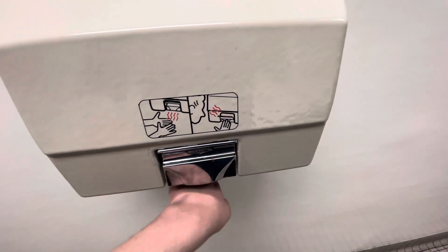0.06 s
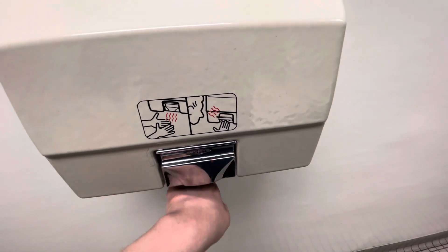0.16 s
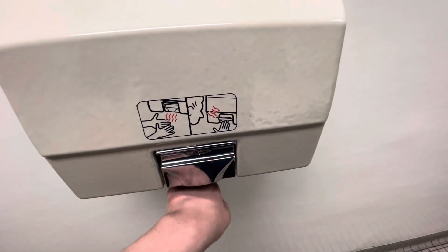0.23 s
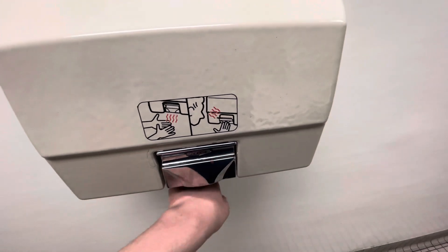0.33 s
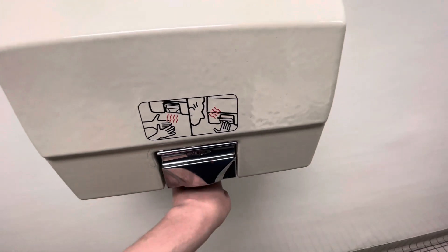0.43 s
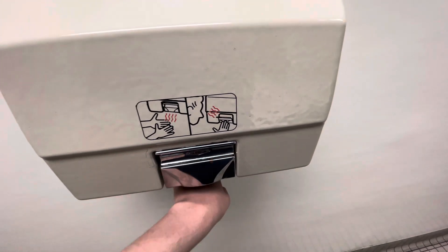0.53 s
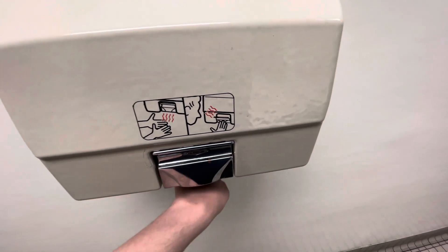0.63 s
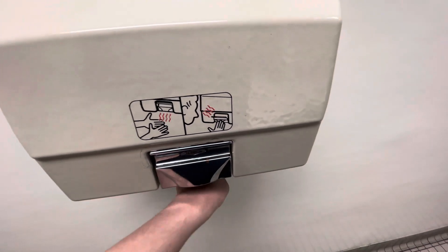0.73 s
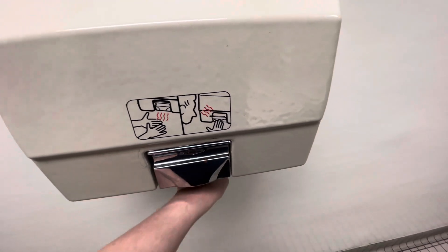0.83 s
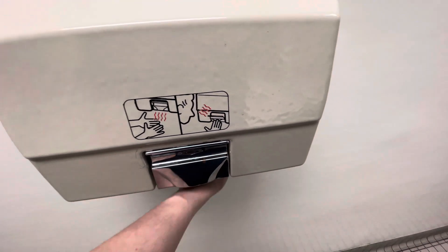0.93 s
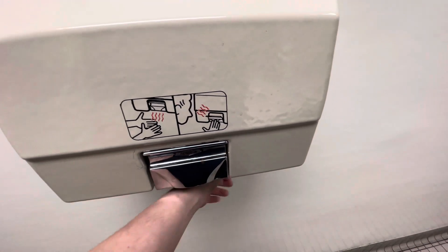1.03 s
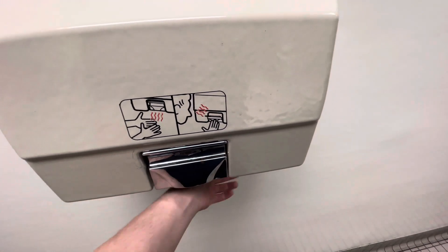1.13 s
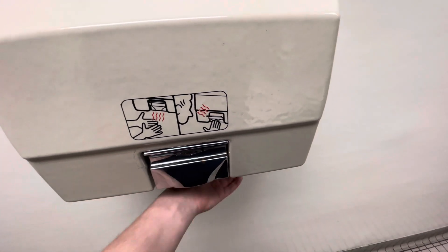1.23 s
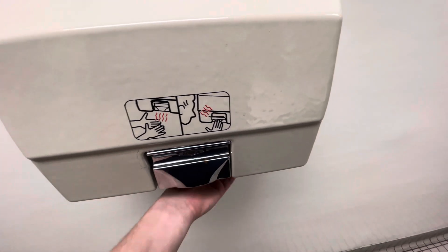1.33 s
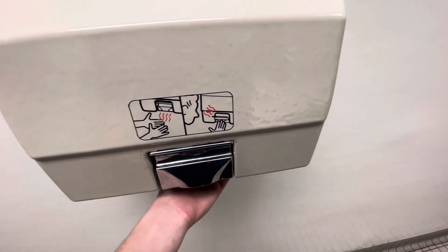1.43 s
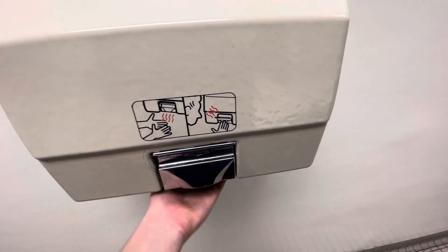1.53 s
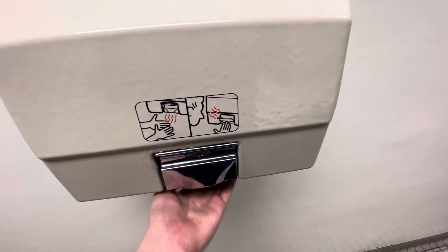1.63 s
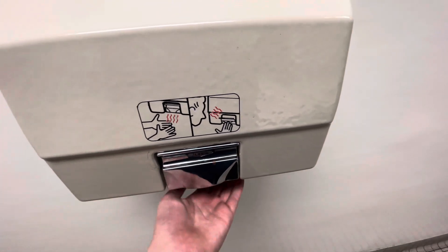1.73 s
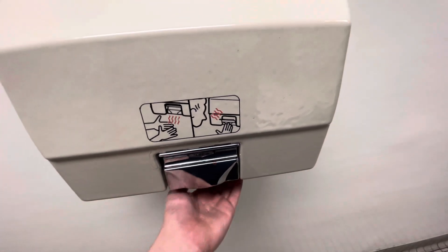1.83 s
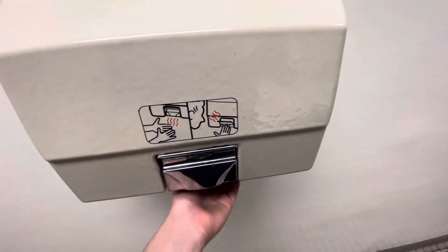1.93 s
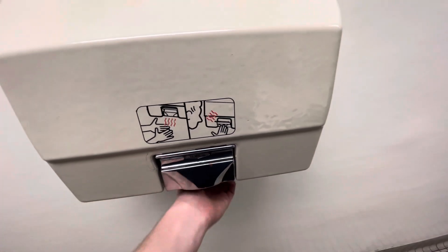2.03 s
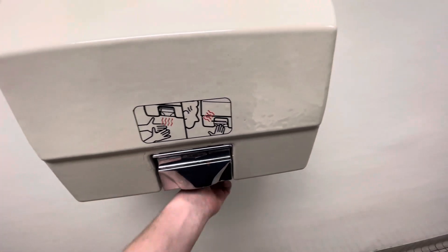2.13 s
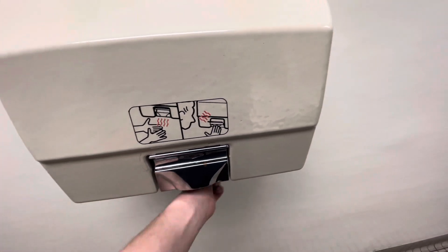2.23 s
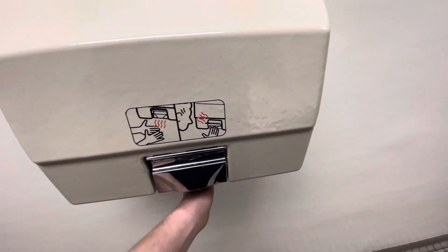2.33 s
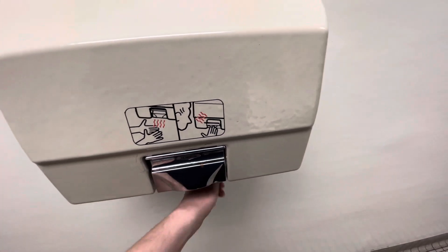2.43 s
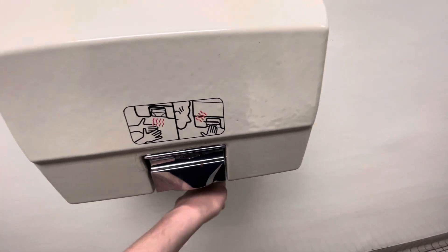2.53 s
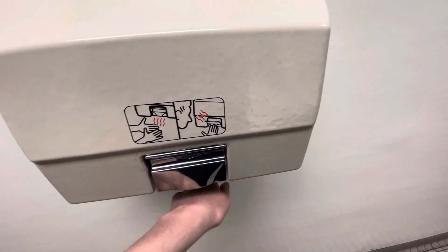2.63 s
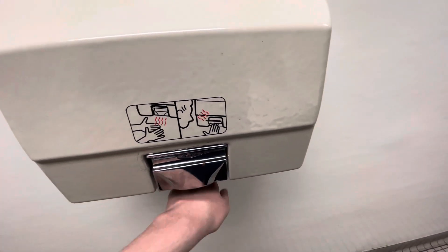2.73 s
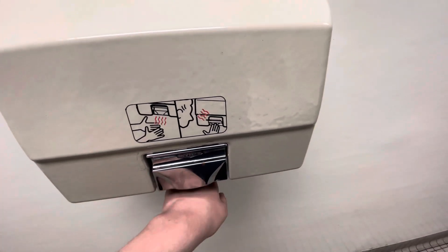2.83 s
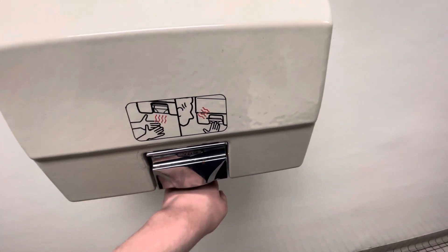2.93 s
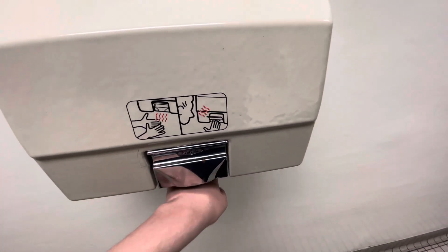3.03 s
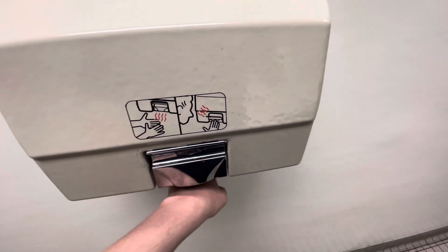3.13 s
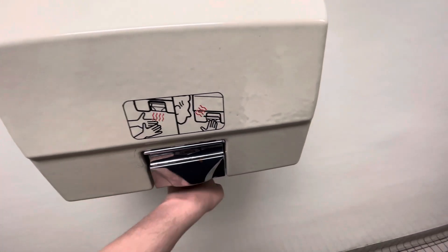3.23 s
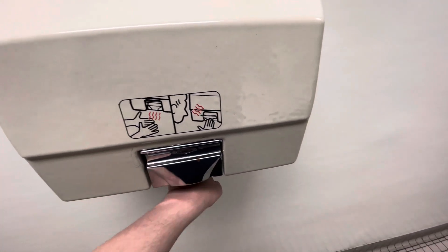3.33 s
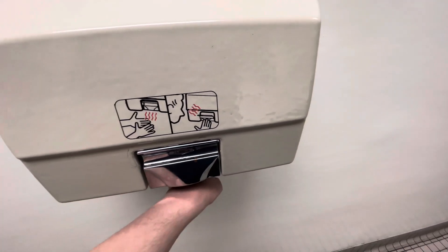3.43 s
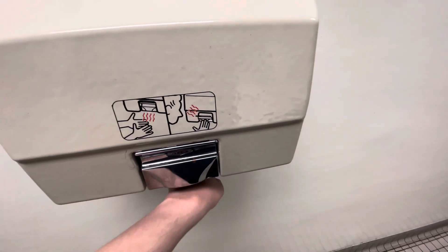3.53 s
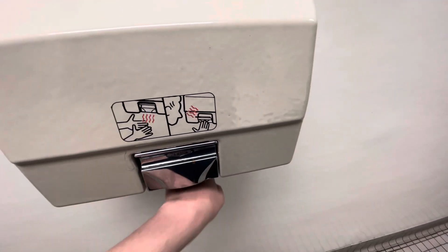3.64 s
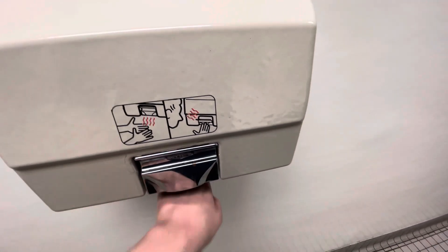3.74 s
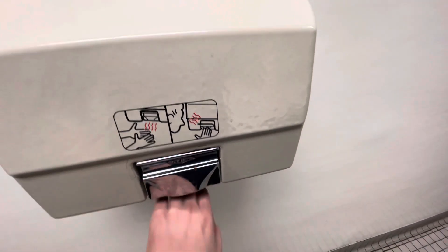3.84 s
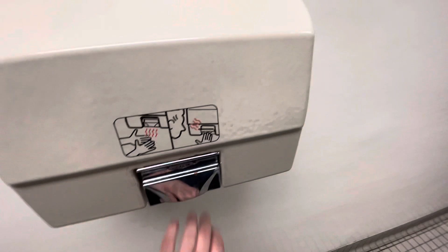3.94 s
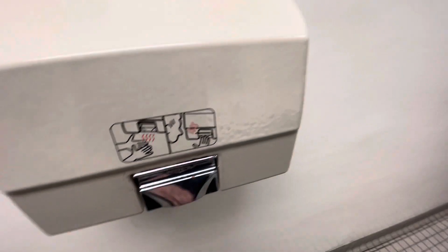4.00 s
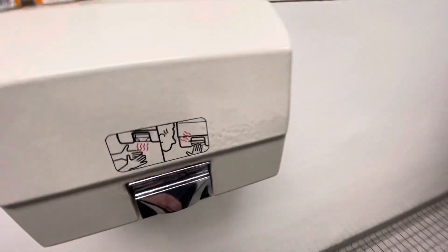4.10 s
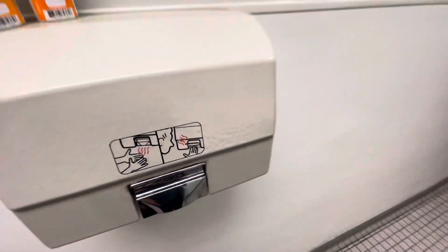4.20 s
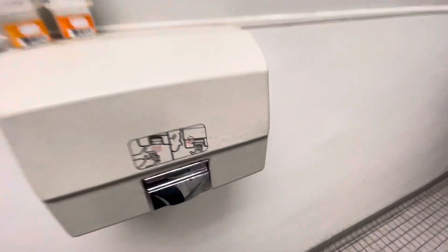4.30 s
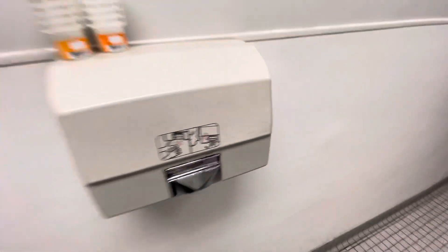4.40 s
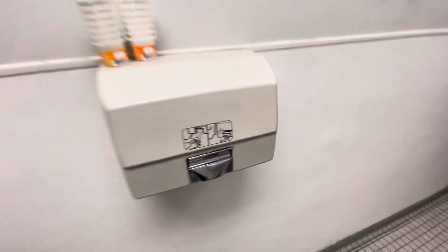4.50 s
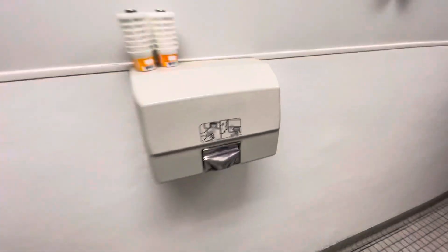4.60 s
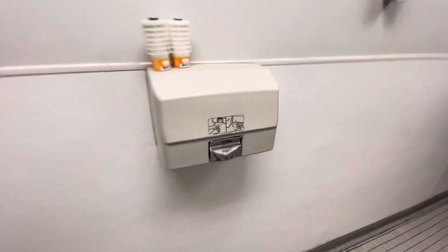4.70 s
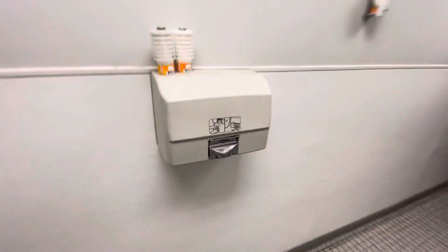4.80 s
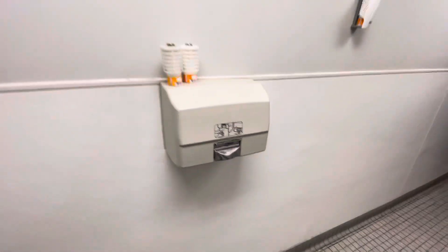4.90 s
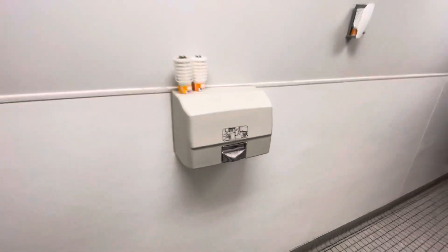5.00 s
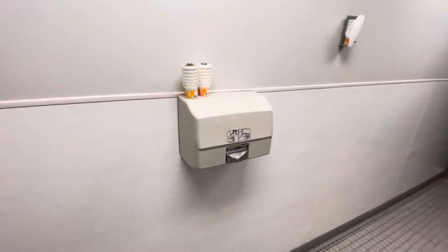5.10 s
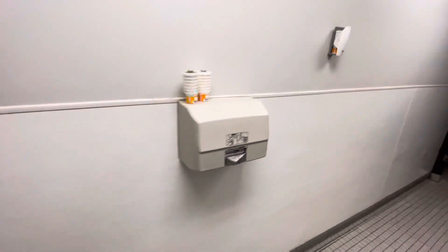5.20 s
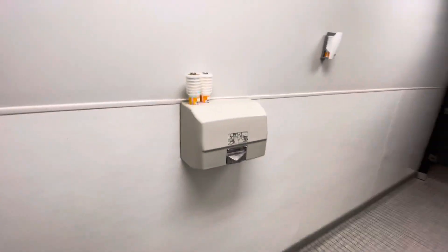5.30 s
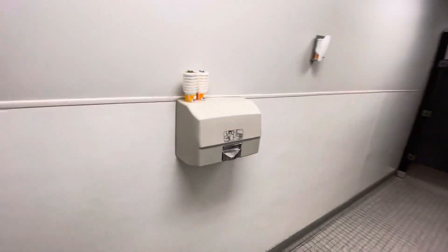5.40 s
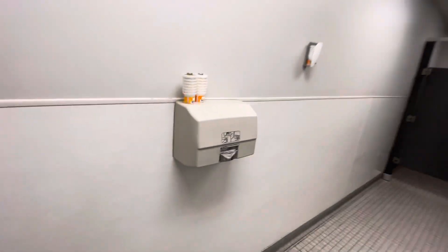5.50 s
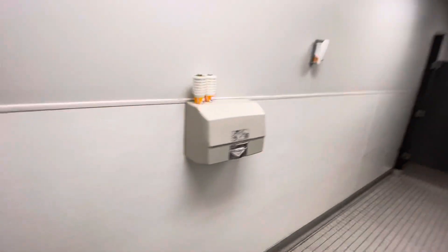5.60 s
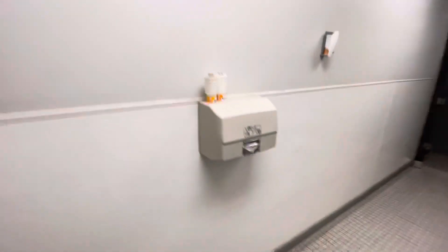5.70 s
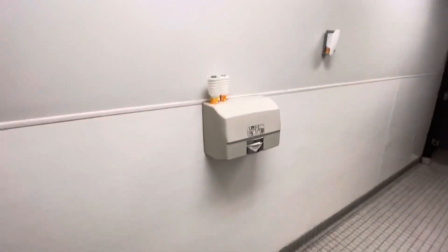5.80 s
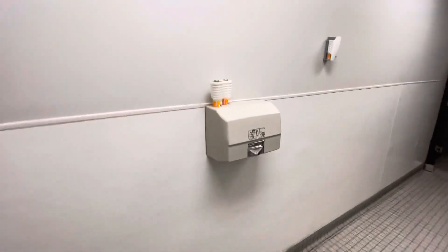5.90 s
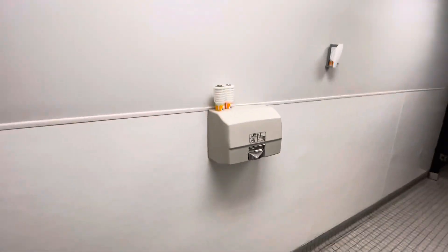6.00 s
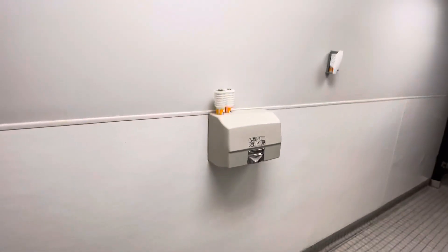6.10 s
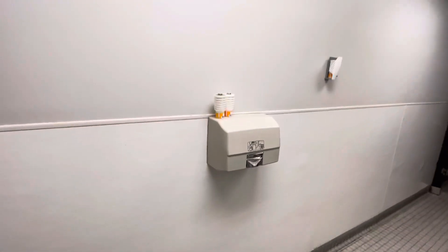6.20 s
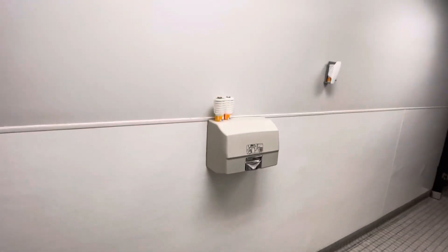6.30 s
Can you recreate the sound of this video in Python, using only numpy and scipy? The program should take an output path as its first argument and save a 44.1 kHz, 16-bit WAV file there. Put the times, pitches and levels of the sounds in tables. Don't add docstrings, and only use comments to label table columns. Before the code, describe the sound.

Close, roaring warm-air dryer with low motor hum and windy buffeting, growing roomier as the listener steps back, before the power stops and the airflow fades.

```python
import sys
import numpy as np
from scipy import signal
from scipy.fft import irfft, next_fast_len
from scipy.io import wavfile
from scipy.ndimage import uniform_filter1d

SR = 44100
rng = np.random.default_rng(int(sys.argv[2]) if len(sys.argv) > 2 else 0)


def boost(x):
    u = np.asarray(x, float) / 20
    return 10 ** u


def wav_record(signal):
    frames = np.transpose(np.atleast_2d(signal))
    bounded = np.clip(frames, -1, 1)
    quanta = np.round(bounded * 32767).astype(np.int16)
    wavfile.write(sys.argv[1], SR, quanta)


N = 280024
T = np.arange(N) / SR
HZ = np.arange(next_fast_len(N) // 2 + 1) * SR / next_fast_len(N)

# frequency in Hz, left minus right in dB.
NEAR_PAN = [(172, -2), (517, 2.5), (1034, 2.5), (1378, 1), (1723, -5.5), (2067, -5), (2929, -0.5),
            (3962, 1.5), (4307, 0.3), (5512, 4), (7407, 0.9), (8786, -6.5), (9819, -1.5), (11370, 1.2)]
FAR_PAN = [(172, -0.5), (1378, 3), (2239, 0.5), (3273, 3), (4134, 0), (4823, 5.5), (6029, 6), (8096, 3),
           (9475, -2), (11370, 2)]
TAIL_PAN = [(172, -0.5), (1895, 6.5), (4479, 3), (5168, 10), (7235, 14), (8441, 8), (8958, 0), (11370, 1.1)]

BACK_FROM_S, BACK_TO_S = 3.83, 5.22
HAND_LEAVES_S, HAND_TAKES_S = 3.82, 0.53
FACING_FROM_S, FACING_TO_S = 4.82, 5.22
SAG_STARTS_S, CUT_S, JET_DIES_S = 5.63, 5.69, 5.695
SIDE = np.array([[0.5], [-0.5]])


def table(rows, at, warp=np.asarray):
    x, *columns = np.transpose(rows)
    return [np.interp(warp(at), warp(x), column) for column in columns]


def ramp(start, end):
    return np.clip((T - start) / (end - start), 0, 1)


def humps(rows):
    return sum(top * np.cos(np.pi * np.clip((T - s) / length, -0.5, 0.5)) ** 2 for s, length, top in rows)


def walk(rate):
    hold = int(SR / rate)
    steps = np.repeat(rng.standard_normal(N // hold + 1), hold)
    smooth = uniform_filter1d(uniform_filter1d(steps, hold), hold)[:N]
    return smooth / smooth.std()


def hiss(count):
    return rng.standard_normal((count, len(HZ))) + 1j * rng.standard_normal((count, len(HZ)))


def swells():
    # start in seconds, length in seconds, level in dB, frequency in Hz, width in Hz.
    passing = [(1.55, 0.39, -33, 2100, 410), (1.549, 0.24, -27, 1260, 380), (5.424, .28, -28.5, 250, 12),
               (5.098, 0.45, -34, 1682, 42), (5.205, 0.36, -37, 2347, 85), (5.3, 0.46, -30.5, 1410, 270),
               (6.255, 0.055, -46, 2520, 300), (6.295, .07, -38, 1010, 25), (4.8, .25, -30, 197, 60),
               (3.72, .16, -39, 3600, 600)]
    out = np.zeros((2, N + SR))
    for s, length, db, hz, width in passing:
        pan_db = 1.9 * table(NEAR_PAN if s < BACK_FROM_S else FAR_PAN, hz)[0]
        start, size = int(s * SR), int(length * SR)
        peak = signal.iirpeak(hz, hz / width, SR)
        ring = signal.lfilter(*peak, rng.standard_normal((2, SR)))
        ring = signal.lfilter(*peak, ring)[:, -size:]
        ring = ring + 0.78 * ring[::-1]
        hump = np.sin(np.pi * np.arange(size) / size)
        out[:, start:start + size] += boost(db + pan_db * SIDE) * hump * ring / ring.std()
    return out[:, :N]


def wind_level():
    # centre in seconds, length in seconds, dB over the steady wind.
    gusts = [(0.0, .3, 9), (.3, .2, 1), (.76, .35, 9), (1.34, .35, 8), (1.72, .2, 5), (2.4, .6, 6),
             (3.0, 0.78, 4), (3.6, .5, 7), (5.67, .1, 4), (6.07, .3, 8)]
    hand_gone = ramp(HAND_LEAVES_S - 0.15, HAND_LEAVES_S)
    running_out = ramp(FACING_TO_S, JET_DIES_S)
    return -43 + humps(gusts) - 7.5 * hand_gone - 4 * running_out


def air_levels():
    # centre in seconds, length in seconds, strength.
    cuppings = [(1.2, 0.55, 0.26), (1.68, 0.65, 1.1), (3, .3, .3), (3.78, .3, 0.67)]
    # steady level in dB, dB per cupping, dB with the hand gone, dB facing the nozzle,
    # dB lost in the run-down, run-down time constant in seconds.
    layers = [
        (-22.5, -1.5, -4, -1, -12.5, 0.18),
        (-24.5, 2, -2.5, .8, -21.5, 0.62),
        (-34, 1.5, -2.5, 4, -19.5, 0.3),
        (-35.5, 2.5, -2, 3.5, -17, 0.35),
    ]
    cup = humps(cuppings)
    gone = ramp(HAND_LEAVES_S, HAND_LEAVES_S + HAND_TAKES_S)
    facing = ramp(FACING_FROM_S, FACING_TO_S)
    coasting = np.clip(T - JET_DIES_S, 0, None)
    levels = [wind_level()]
    for db, cup_db, gone_db, face_db, lost_db, tau in layers:
        run_down_db = lost_db * (1 - np.exp(-coasting / tau))
        levels.append(db + cup_db * cup + gone_db * gone + face_db * facing + run_down_db)
    return levels


def ports(gain, alike, lead, pan):
    both, left, right = hiss(count=3)
    share = np.clip(table(alike, HZ)[0], 0, 1)
    turn = np.exp(0.5j * table(lead, HZ)[0])
    tilt = boost(table(pan, HZ)[0] / 2)
    shared, own = np.sqrt(share), np.sqrt(1 - share)
    left_port = tilt * (shared * turn * both + own * left)
    right_port = (shared / turn * both + own * right) / tilt
    return gain * np.array([left_port, right_port])


def turbulence(colour, column, alike, lead, pan):
    # frequency in Hz, width in Hz, lift in dB close by,
    # lift in dB far off, lift in dB in the tail.
    casing = [(62, 25, 10, 7, 5), (128.5, 14, 7, 0, 0.3), (172, 14.8, 11, 5, -3), (196, 33, 5.5, 7, 7.5),
              (254, 25, 1.7, 2.5, 10.5), (311.2, 7.2, 8.5, -9, -3), (334, 20, 4.5, 1.5, 3),
              (406, 63, 3.5, -7, 5.5), (458, 14, -5, 6.5, -4), (785, 26, 3, 4, 7.5),
              (965.2, 29, 1.8, 5, -7), (1057, 30, -1, 2, -8), (1121, 78, 10, 6, -0.5),
              (1252, 48, 4, 3, 5.5), (1288, 29, 8, 0.4, 0), (1388, 48, 11, -1.5, -3),
              (1495, 42, 9.5, -8, 3), (1600, 51, 9.5, -5.5, 0.0), (2142, 32, 6, 0, 3),
              (2330, 54, 2, 8, 7.5), (3320, 180, 7.5, -1, 0.1), (3950, 247, 5, -1, -1),
              (6770, 92, 5, 4.5, 1)]
    lift_db = sum(row[column] / (1 + (2 * (HZ - row[0]) / row[1]) ** 2) for row in casing)
    colour_db = table(np.vstack(colour), HZ + 1, np.log)[0]
    return ports(boost(colour_db + lift_db), np.vstack(alike), np.vstack(lead), pan)


def band(spectra, edge):
    x = irfft(spectra * edge)[:, :N]
    return x / x.mean(axis=0).std()


def air():
    # frequency in Hz, level in dB.
    near_colour = [
        [(25, -32), (50, -11.5), (100, -6.5), (150, -7), (200, 0.0), (280, -4), (370, -11), (520, -8.5), (850, -10.5), (1000, -7), (1650, -15), (1850, -16)],
        [(2700, -15.5), (3000, -15.5), (3600, -24), (4400, -27), (5400, -23.5), (6500, -21), (7500, -24.5), (8700, -22.5), (9700, -23.5), (10600, -18), (11500, -27), (12100, -33.5), (12600, -47.1), (13200, -72.1)],
    ]
    far_colour = [
        [(25, -26), (50, -17), (100, -8), (150, -6), (200, 1.5), (280, 0), (370, -0.5), (520, -6.5), (850, -3.5), (1000, -5), (1650, -3), (1850, -12)],
        [(2700, -7.5), (3000, -10.5), (3600, -16), (4400, -22.5), (5400, -22.5), (6500, -18), (7500, -18.5), (8700, -23.5), (9700, -21.5), (10600, -20.5), (11500, -30.5), (12100, -43.3), (12600, -48.9), (13200, -73.9)],
    ]
    tail_colour = [
        [(25, -36), (50, -14), (100, -18), (150, -7), (200, 0), (280, -6.5), (370, -16.5), (520, -18), (850, -16.5), (1000, -13.5), (1650, -16.5), (1850, -21)],
        [(2700, -15.5), (3000, -19), (3600, -24), (4400, -29.5), (5400, -30.5), (6500, -25.5), (7500, -27.5), (8700, -28.5), (9700, -31), (10600, -37), (11500, -36), (12100, -96.8), (12600, -88.1), (13200, -113.1)],
    ]
    # frequency in Hz, likeness from 0 to 1.
    near_alike = [
        [(30, 0.32), (200, 0.96), (330, 0.68), (620, 0), (1150, 0.52), (1500, 0.73), (1723, 1), (2100, 0.44), (2412, 0.36), (3101, 0.8), (3700, 0.2), (4300, .62), (5200, 0.24), (6546, 0.3)],
        [(7400, 0.76), (7900, 0), (8400, 0.2), (8786, 0.1), (9400, 0.25), (10000, 0.82), (10500, 0.96), (11300, 0.95), (11800, 0.94)],
    ]
    far_alike = [(30, .7), (100, .95), (172, .88), (517, .26), (2000, .15), (8786, .08), (9400, .55),
                 (10000, .93), (10600, .94), (11300, .6), (11800, .995)]
    # frequency in Hz, phase in radians.
    near_lead = [
        [(172, 0), (1550, 1.2), (1895, 2.5), (2900, 3.2), (3618, 4.2), (4300, 6.35), (4996, 5.2), (5340, 2.9), (6029, 6.1), (6700, 6.8), (7300, 6.3), (8096, 9.2), (8786, 7.6)],
        [(8958, 5.1), (9302, 4.2), (9800, 3.3), (10600, 2.95), (11200, 1.5), (11800, .02)],
    ]
    far_lead = [(172, 0), (1400, -.3), (8613, 1.1), (9400, 3.9), (9800, 3.25), (10700, 3.0), (11370, 1.1),
                (11800, .02)]
    band_edges = [105, 400, 1800, 4500]

    away = np.clip(0.025 + ramp(BACK_FROM_S, BACK_TO_S), 0, 1)
    off = ramp(JET_DIES_S, JET_DIES_S + 0.26)
    near = turbulence(near_colour, column=2, alike=near_alike, lead=near_lead, pan=NEAR_PAN)
    far = turbulence(far_colour, column=3, alike=far_alike, lead=far_lead, pan=FAR_PAN)
    tail = turbulence(tail_colour, column=4, alike=far_alike, lead=far_lead, pan=TAIL_PAN)
    stages = [(1 - away, near), (away * (1 - off), far), (away * off, tail)]

    edges = [1, *band_edges, 16000]
    flickers_db = (0.3, 0.14, 0.73, 0.67, 0.57)
    out = 0
    for lo, hi, db, flicker_db in zip(edges, edges[1:], air_levels(), flickers_db):
        edge = 1 / np.sqrt((1 + (lo / (HZ + 1)) ** 16) * (1 + (HZ / hi) ** 16))
        mix = sum(np.sqrt(share) * band(spectra, edge) for share, spectra in stages)
        out = out + mix * boost(db + flicker_db * walk(16))
    return out


def motor():
    # time in seconds, hum in Hz, hum level in dB.
    powered = [(0, 110.1, -20), (.5, 111.1, -20.5), (1.2, 110.5, -21.5), (1.7, 110.1, -21),
               (2.6, 109.7, -22.5), (3.5, 110.3, -20.5), (4.49, 110.6, -22), (5.5, 110, -31.5),
               (5.62, 110.2, -29)]
    # multiple of the hum (rounded in use), dB relative to it, wobble in dB, left minus right in dB.
    overtones = [(0.9997, 0.5, .5, -1), (2.013, -12.5, 3.5, 1.5), (4.04, -30.5, 3.1, 14),
                 (5.013, -24.5, 4, 6), (5.953, -23, 4, 5), (6.97, -24.5, -1.5, -3), (7.95, -29.5, 3, -4),
                 (12.02, -17.5, 4, -7), (47.4, -38, 7.5, 4)]
    hz, db = table(powered, T)
    since_cut = np.clip(T - CUT_S, 0, 1)
    over_db = 0.48 * (db + 22) - 21 - 300 * since_cut
    hum_db = db - 420 * since_cut
    hz = hz - 50 * np.clip(T - SAG_STARTS_S, 0, 1)
    phase = 2 * np.pi * np.cumsum(hz * (1 + 0.001493 * walk(4))) / SR
    out = 0
    for multiple, under_db, wobble_db, pan_db in overtones:
        k = round(multiple)
        line_db = (hum_db if k == 1 else over_db) + under_db + wobble_db * walk(9)
        gain = boost(line_db) * boost(SIDE * pan_db)
        out = out + np.sqrt(2) * gain * np.sin(k * (phase + 0.098 * SIDE) + rng.uniform(0, 2 * np.pi))
    return out


def scene():
    return swells() + air() + motor()


def low_pass(x):
    return signal.sosfilt(signal.butter(12, 13280, fs=SR, output="sos"), x)


def record(dry):
    return low_pass(np.tanh(0.58 * dry) / 0.62)


dry = scene()
out = record(dry)
wav_record(out)
```